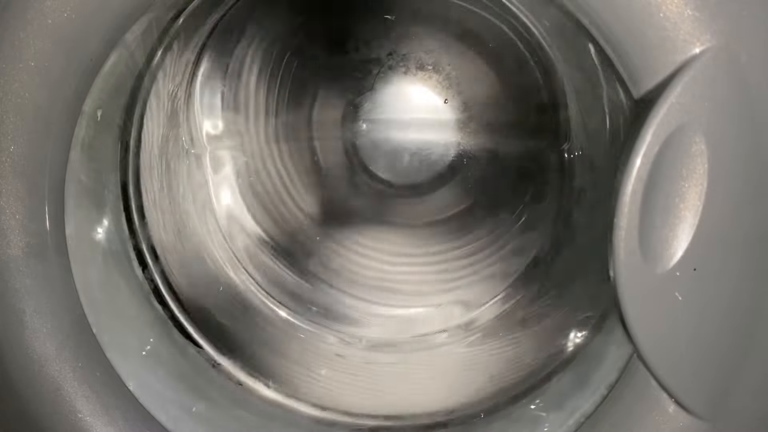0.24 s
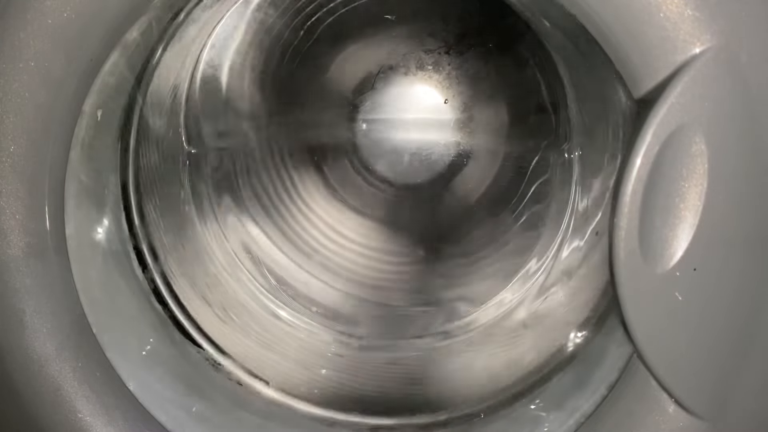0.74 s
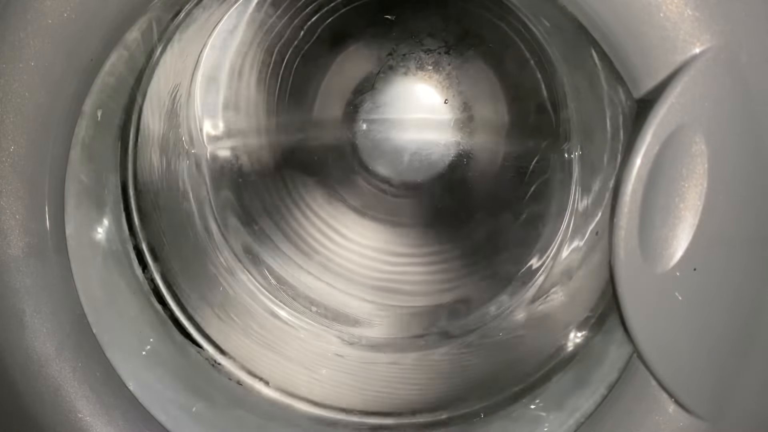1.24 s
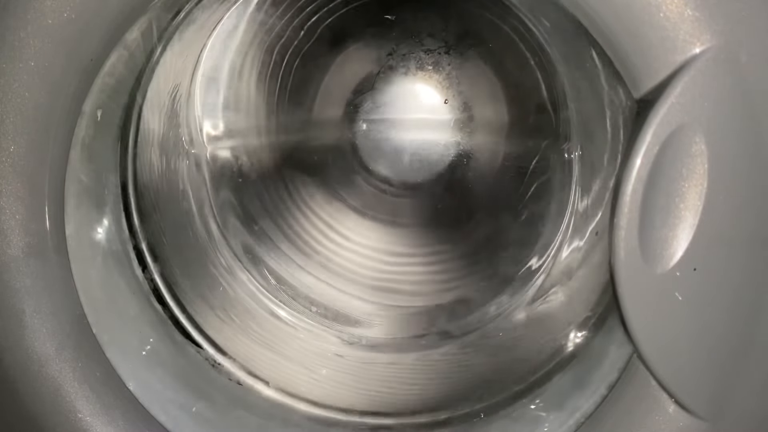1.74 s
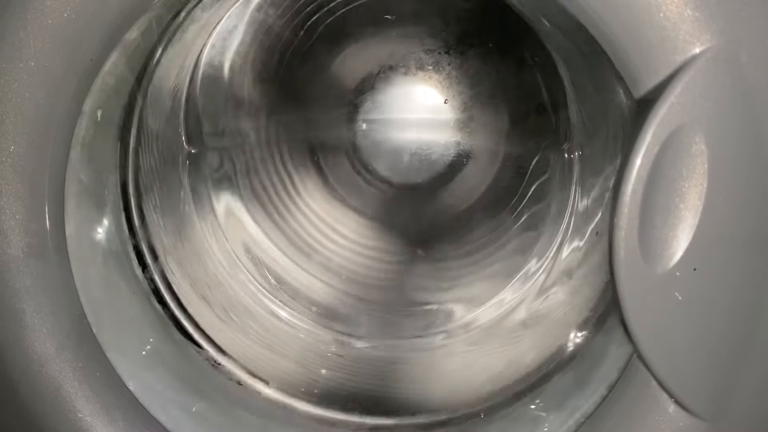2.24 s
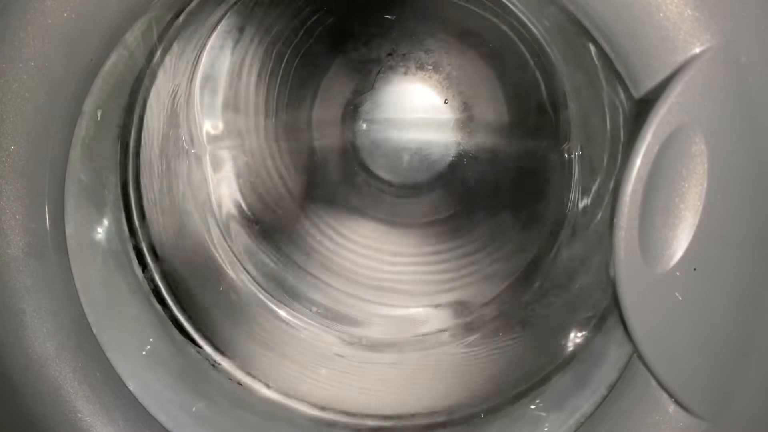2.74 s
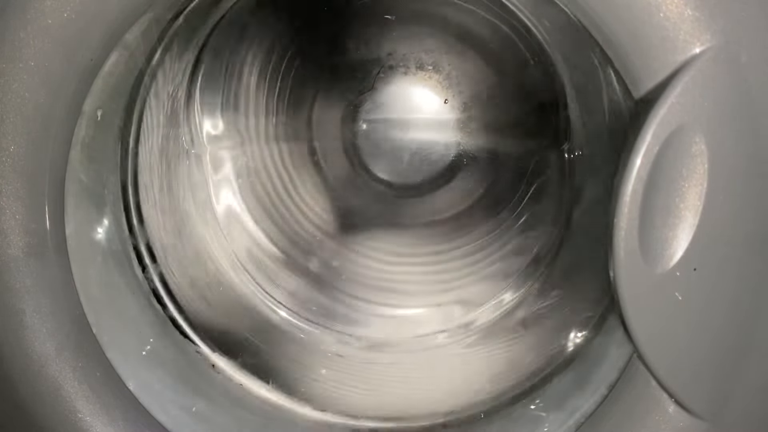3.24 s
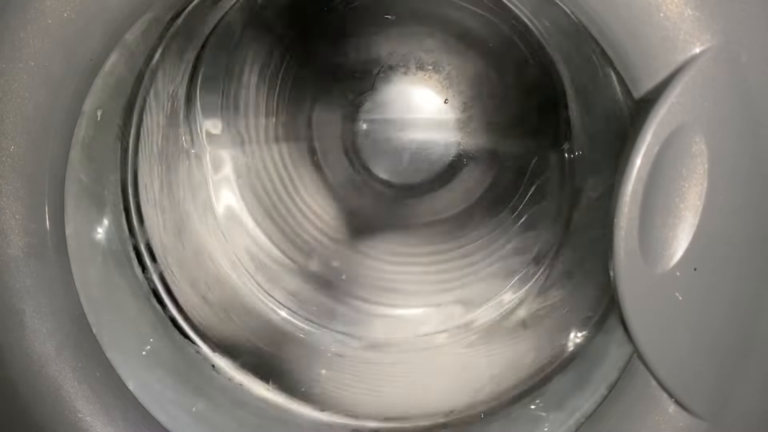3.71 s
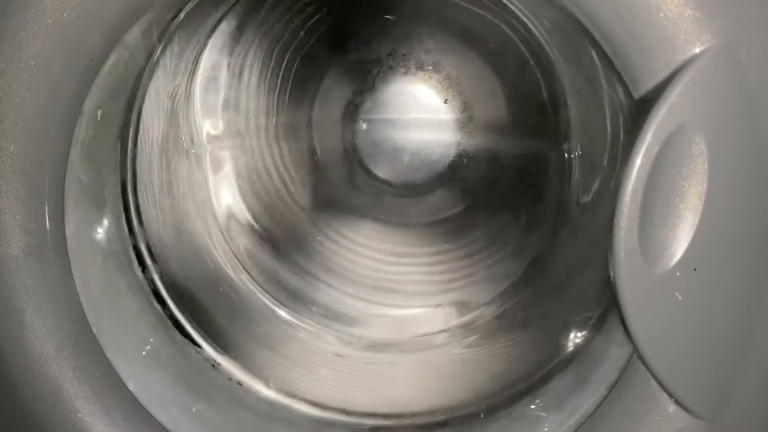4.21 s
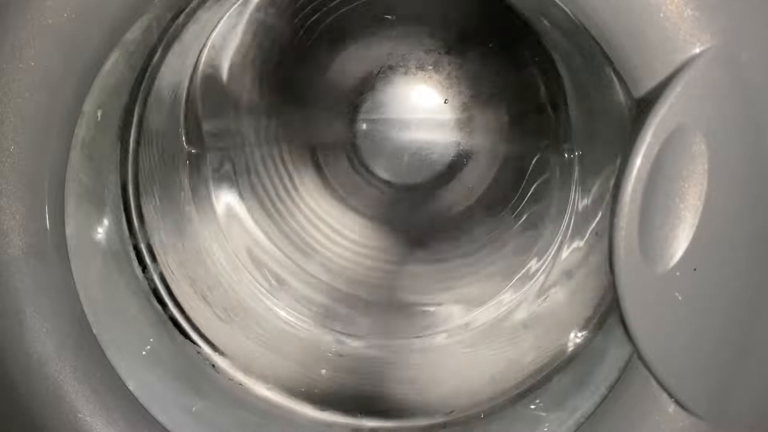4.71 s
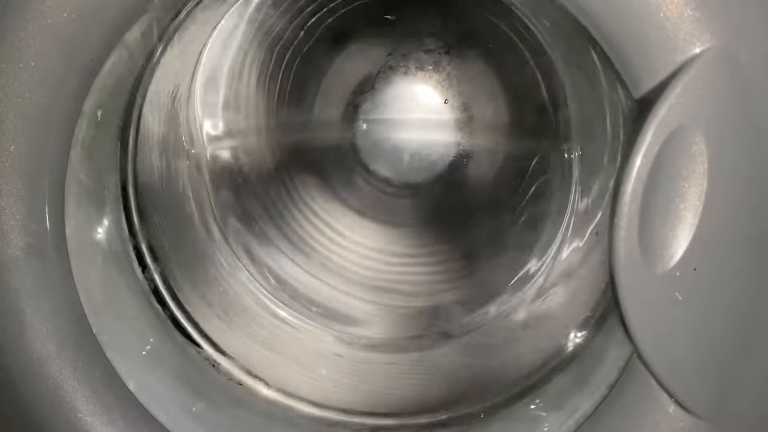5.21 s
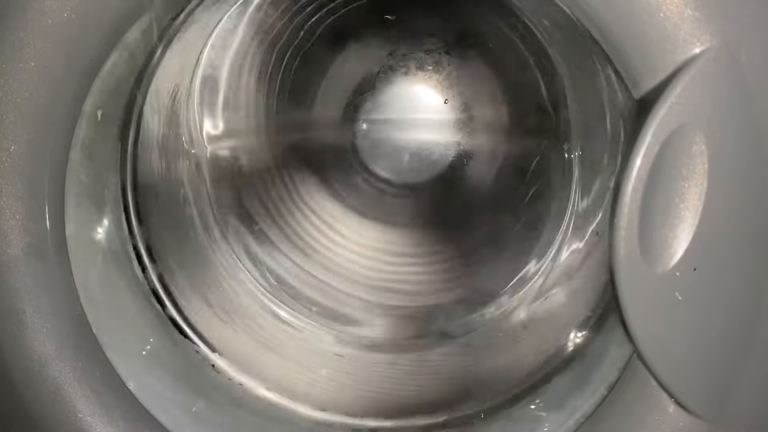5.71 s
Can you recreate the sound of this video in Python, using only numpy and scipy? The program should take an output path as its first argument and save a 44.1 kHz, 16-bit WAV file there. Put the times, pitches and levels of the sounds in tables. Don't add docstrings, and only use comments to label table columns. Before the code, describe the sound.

Close to a washer door, a droning spin cycle climbs gradually in pitch, with airy roar, thin whine and one soft low thud.

```python
import sys
import numpy as np
from scipy import signal
from scipy.fft import rfft, irfft, next_fast_len
from scipy.io import wavfile

SR = 44100
rng = np.random.default_rng(int(sys.argv[2]) if len(sys.argv) > 2 else 0)


def level_to_linear(level):
    exponent = np.asarray(level, float) / 20
    return 10 ** exponent


def int16_out(signal):
    q = np.round(np.clip(np.atleast_2d(signal).T, -1, 1) * 32767)
    wavfile.write(sys.argv[1], SR, q.astype(np.int16))


N = 262395
TIME = np.arange(N) / SR
STEP = 64
COARSE = TIME[::STEP]

SHAFT_ORDER, BALL_PASS_ORDER = 6.711, 34.62
BEARING_STEP, BEARING_OFFSET = 23.07, -3.5


# [start_s, turns_per_s]
SPEED = [(0.0, 17.165), (1.0, 17.696), (2.0, 18.299), (3.0, 18.914), (4.0, 19.463), (5.0, 20.1),
         (5.95, 20.672)]


def rotors():
    hz, = in_time(SPEED)
    turns = np.cumsum(hz) / SR
    out = main_hums(turns, hz)
    out += drum_and_roller_tones(turns, hz)
    out += bearing_and_commutator_tones(turns, hz)
    return out


# [center_hz, width_hz, peak_db, rest_db]
HUM = [
    (127, 18, -33, -44),
    (139, 24, -30, -50),
    (424, 14, -27, -42),
    (691, 36, -30.5, -48),
]


def main_hums(turns, hz):
    orders = (SHAFT_ORDER, SHAFT_ORDER + 1, 21, BALL_PASS_ORDER)
    gains = []
    for order, (center_hz, width_hz, peak_db, rest_db) in zip(orders, HUM):
        swell = crossing([(center_hz, width_hz, peak_db - rest_db)], order * hz[::STEP])
        gains.append(fine(level_to_linear(rest_db) * swell))
    shaft, beat, rib, ball = gains
    out = tone(SHAFT_ORDER, turns, hz, shaft, left_db=-1.2)
    out += tone(SHAFT_ORDER + 1, turns, hz, beat, left_db=0.7)
    out += tone(21, turns, hz, rib, lead=-0.19, left_db=6.5)
    out += tone(BALL_PASS_ORDER, turns, hz, ball, lead=-1.05, left_db=1.2)
    return out


DRUM_ORDERS = [4, 5, 9, 10, 12, 13, 14, 15, 16, 18, 20, 22, 23, 24, 26, 27, 28, 30, 32, 36, 38, 42, 45, 48,
               49, 52, 54]
DRUM_DB = [-56, -62, -58, -58.5, -55, -58.5, -60.5, -60.5, -58.5, -59, -58, -68, -72.5, -63.5, -55.5, -65,
           -65, -69, -57, -59, -69, -53, -54.5, -67, -63, -55, -54]
ROLLER_ORDERS = [8.71, 17.81, 18.19, 18.5, 20.31, 20.56, 21.5, 24.38, 29.45, 40.25, 43.8, 56.19]
ROLLER_DB = [-66, -55, -58.5, -54.5, -62.5, -67, -69.5, -74.5, -66.5, -64, -58, -59.5]
# [center_hz, width_hz, peak_db]
TUB = [(98, 10, 12), (178, 12, 9), (258, 24, 7), (280, 28, 14), (338, 24, 11), (369, 12, 14), (423, 16, 17),
       (475, 10, 8), (532, 18, 12), (701, 12, 6), (759, 10, 6), (804, 10, 5), (858, 24, 4), (985, 40, 8)]


def drum_and_roller_tones(turns, hz):
    out = np.zeros((2, N))
    for order, db in zip(DRUM_ORDERS + ROLLER_ORDERS, DRUM_DB + ROLLER_DB):
        pitch_hz = order * hz[::STEP]
        level = level_to_linear(db + 1.5 + 2.83 * drift(1.0))
        gain = fine(level * cabinet(pitch_hz) * crossing(TUB, pitch_hz))
        out += tone(order, turns, hz, gain, spread(order), left_db_at(order * hz[0]))
    return out


BEARING_DB = [-73.5, -75.5, -75, -92, -75.5, -80.5, -80.5, -82.5, -83, -80, -78]
TOP_DB = [-74, -77, -71, -73, -70.5, -77.5, -80, -77, -77, -73, -72, -72]
RIPPLE_SIDES = [-1, 0, 1, 3]
RIPPLE_DB = [-70, -63.5, -68, -69]
WEAK_ORDERS = [112.2, 121, 126, 135.3, 138, 140.4, 148.2, 149.3, 154.8, 156.1, 161, 174.5, 204.5, 206.2,
               209.5, 225, 230.3, 232, 234.75, 242, 244.3, 255.3, 277.3]
WEAK_DB = [-64.5, -69.5, -75, -73, -71, -77.5, -74, -74.5, -78, -84, -70.5, -71.5, -75.5, -73, -84, -82,
           -83, -76, -86, -75, -80, -77, -75.5]
SIDE_ORDERS = [294.7, 301, 311.4, 324.4, 332.5, 347.3, 350, 363.5, 369.5, 379.6, 386.3, 393.5, 397.3, 402.5,
               413, 420, 490.8 + BEARING_STEP, 543]
SIDE_DB = [-73, -80, -84, -83, -98, -87, -85, -83.5, -86, -87, -85.5, -92, -92, -82, -99, -80.5, -72, -76]
# [center_hz, width_hz, peak_db]
SMALL_RESONANCES = [(2291, 88, 9), (2423, 88, 10), (2504, 24, 17), (2561, 39, 17), (2652, 44, 14), (2717, 72, 16),
                    (2786, 24, 19), (2880, 53, 16), (3038, 88, 8), (3269, 32, 13), (3883, 42, 14),
                    (4011, 45, 13), (4086, 25, 11), (4177, 33, 14), (4253, 43, 17), (4289, 24, 14),
              (4373, 35, 19), (4561, 77, 12), (4657, 44, 18), (4712, 88, 15), (4814, 70, 15),
              (4934, 56, 16), (5020, 88, 15), (5128, 58, 14), (5272, 88, 14),
                    (5668, 88, 14), (6084, 26, 22), (6124, 24, 16), (6280, 88, 25), (6405, 43, 23),
              (6472, 80, 26), (6536, 88, 17), (6716, 50, 22), (6791, 49, 22), (6920, 73, 24),
              (7003, 65, 21), (7082, 80, 14), (7166, 43, 25), (7289, 74, 26),
                    (7915, 50, 16), (7980, 40, 18), (8150, 49, 10), (8400, 40, 8), (8538, 42, 10),
                 (8620, 40, 9), (8820, 40, 14), (8950, 70, 10), (9120, 40, 9), (9312, 70, 18),
                 (9575, 45, 11), (9800, 40, 9), (10530, 75, 12),
                    (10150, 70, 8), (10850, 70, 8), (11230, 80, 13), (11700, 70, 8), (12150, 70, 9), (12600, 80, 11),
        (12900, 80, 10), (14300, 80, 9)]


def bearing_and_commutator_tones(turns, hz):
    wobble = turns + .0006 * fine(drift(10))
    rough = level_to_linear(1.5 * drift(40))
    bearing = [BEARING_STEP * k + BEARING_OFFSET for k in range(10, 33)]
    segments = 72
    ripple = [SHAFT_ORDER * (segments + side) + .4 for side in RIPPLE_SIDES]
    orders = bearing + ripple + WEAK_ORDERS + SIDE_ORDERS
    levels_db = BEARING_DB + TOP_DB + RIPPLE_DB + WEAK_DB + SIDE_DB
    small_parts = SMALL_RESONANCES
    out = np.zeros((2, N))
    for order, db in zip(orders, levels_db):
        flare = crossing(small_parts, order * hz[::STEP])
        level = level_to_linear(db + 3 + 1.2 * drift(4))
        gain = fine(rough * flare * level)
        out += tone(order, wobble, hz, gain, left_db=left_db_at(order * hz[0]))
    return out


PUMP_MULTIPLES = [1, 2, 3, 4, 5, 6, 7, 8, 9, 10, 11]
PUMP_DB = [-44, -31, -42.5, -58, -51.5, -58, -54, -52, -35.5, -61, -64]


def pump():
    mains_hz = 50.118
    out = np.zeros((2, N))
    for multiple, db in zip(PUMP_MULTIPLES, PUMP_DB):
        gain = fine(level_to_linear(db + 1.43 * drift(6.3)))
        out += tone(multiple, mains_hz * TIME, 0, gain, left_db=left_db_at(multiple * mains_hz))
    return out


# [start_s, pitch_hz, level_db, fade_60db_s]
THUMP = (5.25, 53, -17, .2)


def thump():
    start_s, pitch_hz, level_db, fade_s = THUMP
    age = np.maximum(TIME - start_s, 0)
    fade = level_to_linear(level_db - 60 * age / fade_s)
    onset = np.exp(-age / .03) - 1
    return fade * onset * np.sin(2 * np.pi * pitch_hz * age)


# [start_s, level_db]
ROAR = [
    (0.0, -38),
    (5.95, -36),
]
# [pitch_hz, level_db per Hz]
ROAR_COLOR = [(18, -48), (42, -16), (62, -7.5), (112, -4), (155, -6), (204, -16), (263, -7.5), (324, -7),
              (591, -12), (938, -8), (1490, -16.5), (3300, -28), (3650, -30.5), (6000, -39.5)]
# [center_hz, width_hz, peak_db]
CAVITIES = [(1200, 64, 3.5), (1331, 50, 4), (1500, 31, 1), (1776, 58, 2), (2250, 85, 0), (2562, 25, -2),
            (2720, 20, -4), (3146, 340, 4)]
# [pitch_hz, likeness from -1 to 1]
LIKENESS = [(60, 0.93), (130, 0.84), (290, 0.55), (640, 0.15), (1100, -0.13), (1700, 0.064), (3100, 0.56),
            (5000, 0.28), (7500, -1.3)]


def roar():
    def color(hz):
        return level_to_linear(at_hz(ROAR_COLOR, hz)) * cabinet(hz) * crossing(CAVITIES, hz) * (hz < 6700)

    def likeness(hz):
        return at_hz(LIKENESS, hz)

    def lead(hz):
        return -.3 * (hz > 300)

    level_db, = in_time(ROAR)
    return level_to_linear(level_db + 10) * stereo_noise(color, likeness, lead)


# [pitch_hz, level_db per Hz]
HISS_COLOR = [(4200, -31), (4800, -7), (5700, -8.5), (6400, 2), (7200, -2), (9000, -3.5), (11000, -2.5),
              (13000, -8), (15500, -3)]


def brushes():
    def color(hz):
        return level_to_linear(at_hz(HISS_COLOR, hz)) * (hz > 4100) * (hz < 15700)

    def likeness(hz):
        return .985 + 0 * hz

    noise = stereo_noise(color, likeness, port_phase)
    return fine(level_to_linear(-46.0 + 0.44 * drift(12))) * noise


# [center_hz, width_hz, peak_db]
CABINET = [(148, 18, 3.5), (268.8, 15, 6.5), (382, 6.1, 9.5), (421.5, 5.7, 12.5), (505, 29, -3.5),
           (524, 30.3, 11.5), (647, 24, 5.5), (781, 6.7, 9), (915, 14, 9), (968, 40, 5.5), (1665, 18, 9.5),
           (2154, 12.4, 11), (5040, 1610, 6.5), (6360, 116, -5)]


def cabinet(hz):
    power = 1
    for center_hz, width_hz, db in CABINET:
        power = power + level_to_linear(db) ** 2 / (1 + (2 * (hz - center_hz) / width_hz) ** 2)
    return np.sqrt(power)


def crossing(modes, hz):
    power = 1
    for center_hz, width_hz, db in modes:
        power = power + level_to_linear(db) ** 2 / (1 + (2 * (hz - center_hz) / width_hz) ** 2) ** 2
    return np.sqrt(power)


def small_modes(hz):
    spacing_hz, depth_db = 35, 2
    knots = np.arange(0, SR / 2 + spacing_hz, spacing_hz)
    bumps = np.interp(hz, knots, rng.standard_normal(len(knots)))
    return level_to_linear(depth_db * bumps * (hz > 1400))


def tone(order, turns, hz, gain, lead=0., left_db=0.):
    angle = 2 * np.pi * (order * turns + .618 * order ** 2)
    lead = lead + port_phase(order * hz)
    tilt = level_to_linear(left_db / 2)
    left = tilt * np.sin(angle)
    right = np.sin(angle + lead) / tilt
    return np.sqrt(2) * gain * np.array([left, right])


def stereo_noise(color, likeness, lead):
    size = next_fast_len(N)
    hz = np.arange(size // 2 + 1) * SR / size
    common, own = rfft(rng.standard_normal((2, size)))
    alike = np.clip(likeness(hz), -1, 1)
    tilt = level_to_linear(left_db_at(hz) / 2)
    right = alike * np.exp(1j * lead(hz)) * common + np.sqrt(1 - alike ** 2) * own
    pair = np.array([tilt * common, right / tilt])
    out = irfft(color(hz) * small_modes(hz) * pair, size)[:, :N]
    return out / out.std()


# [pitch_hz, left_over_right_db]
LEFT_DB = [(60, -.8), (110, -.6), (200, -1), (380, 3.5), (700, 1), (1290, 2), (2380, 2), (4400, 3),
           (6000, .5), (15000, 0)]


def left_db_at(hz):
    return at_hz(LEFT_DB, hz)


def port_phase(hz):
    lag_s, in_step_hz = 1 / 4150, 6980
    return 2 * np.pi * (np.maximum(hz, 6550) - in_step_hz) * lag_s * (hz > 6000)


def spread(order):
    return order / 45 * np.sin(7 * order)


def drift(rate_hz):
    r = np.exp(-2 * np.pi * rate_hz * STEP / SR)
    chance = rng.standard_normal(len(COARSE) + 2000)
    slow = signal.lfilter([1], [1, -2 * r, r * r], chance)[2000:]
    return (slow - slow.mean()) / slow.std()


def fine(control):
    return np.interp(TIME, COARSE, control)


def in_time(rows):
    start_s, *columns = np.transpose(rows)
    return [np.interp(TIME, start_s, column) for column in columns]


def at_hz(points, hz):
    pitch_hz, value = np.transpose(points)
    return np.interp(np.log(hz + 1), np.log(pitch_hz), value)


def scene():
    return rotors() + pump() + thump() + roar() + brushes()


def top_cut(x):
    return signal.sosfilt(signal.butter(12, 15860, fs=SR, output="sos"), x)


def record(dry):
    return top_cut(dry)


dry = scene()
out = record(dry)
int16_out(out)
```